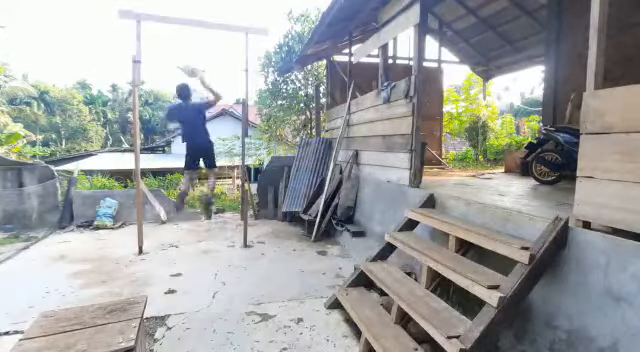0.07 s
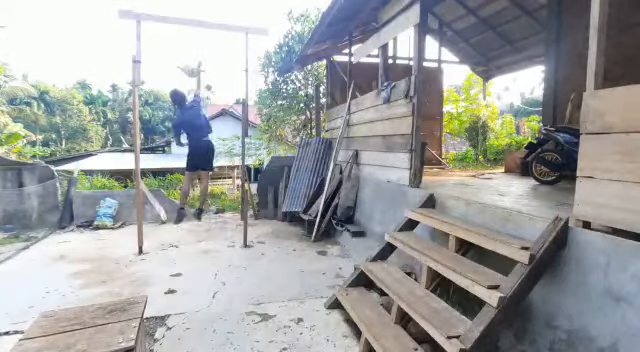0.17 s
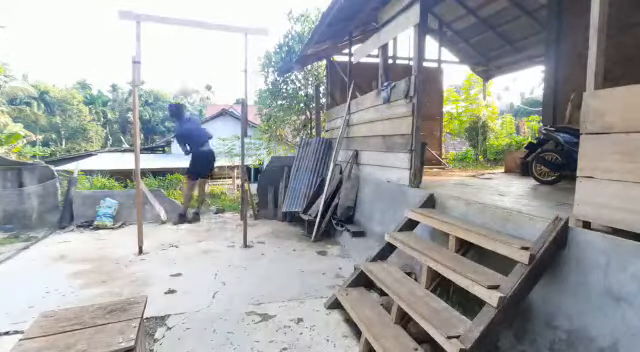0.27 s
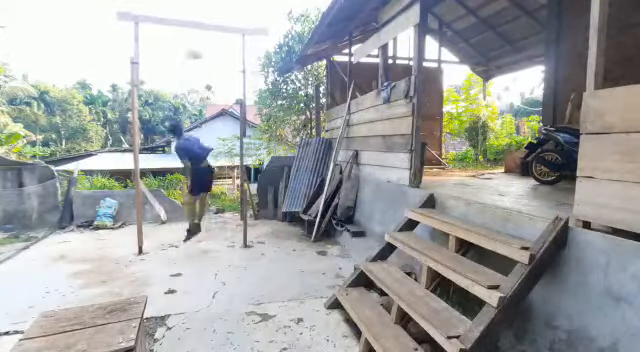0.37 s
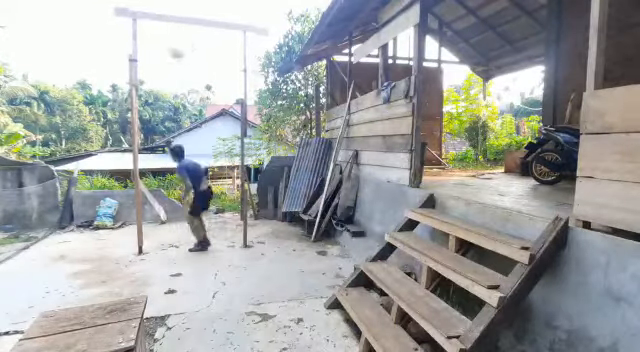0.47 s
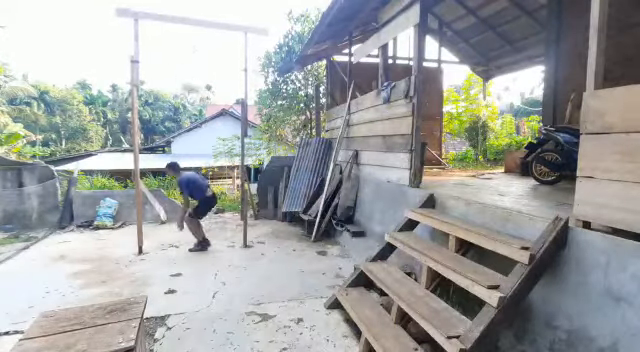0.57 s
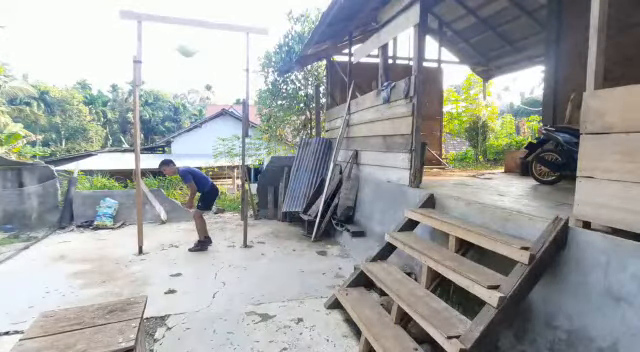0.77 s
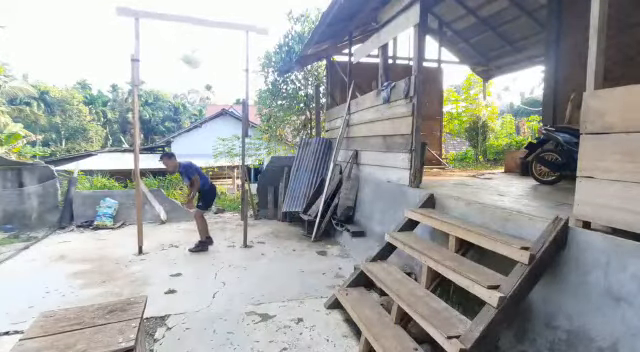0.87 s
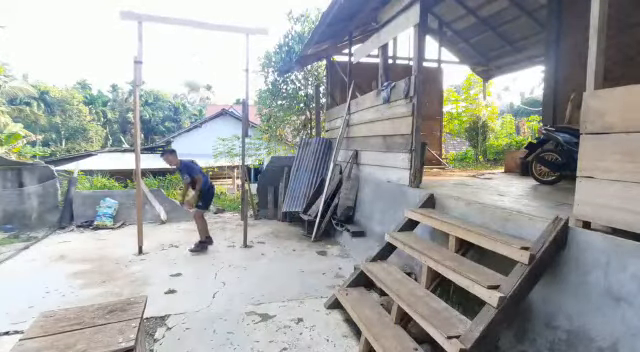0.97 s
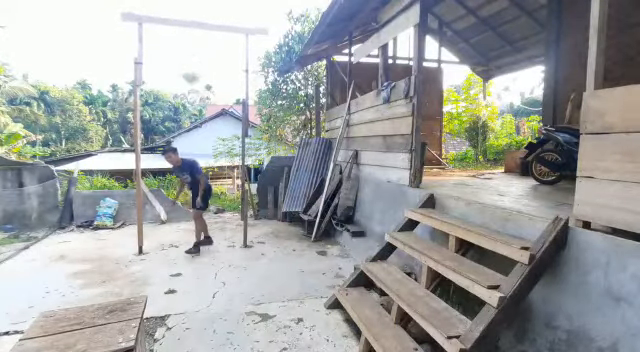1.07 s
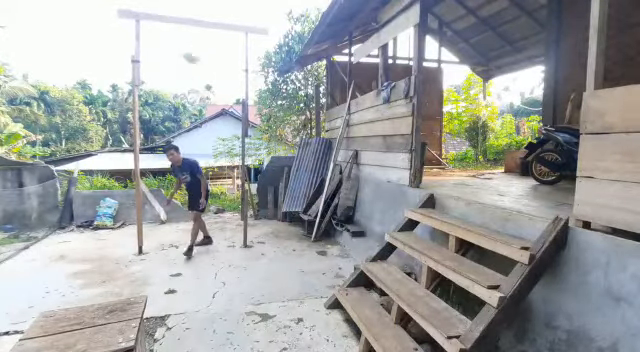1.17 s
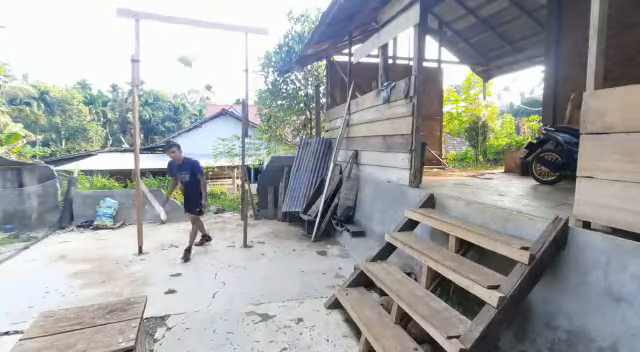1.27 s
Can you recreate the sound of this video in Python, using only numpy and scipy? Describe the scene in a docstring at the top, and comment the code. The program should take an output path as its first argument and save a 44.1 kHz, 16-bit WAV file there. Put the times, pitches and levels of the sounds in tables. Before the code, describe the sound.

One loud ball slap in an open concrete yard, then shuffling steps with soft thuds and two quieter woody knocks; low receding rumble, far idling engine and thin insects behind, phone microphone a few metres away.

```python
"""A low rumble, a distant idling engine, a thin whine and a faint insect band run under a player's shoes.
The player slaps a ball hanging from a wooden frame in a concrete yard, then shuffles; two hollow knocks follow.
Ball and knocks are sums of dying tones, with noise tails for the yard; house walls echo the blows.
Scuffs, rumble, whine and insects are shaped noise; the engine is a stack of sine waves.
A phone listens, its left port nearer to the play."""
import sys
import numpy as np
from scipy import signal
from scipy.fft import rfft, irfft
from scipy.io import wavfile
from scipy.ndimage import uniform_filter1d

SR = 44100
rng = np.random.default_rng(int(sys.argv[2]) if len(sys.argv) > 2 else 0)


def inscribe(sig):
    """Save sig as 16-bit PCM at rate SR to the path in sys.argv[1].

    A 1-D sig is mono; a 2-D sig holds one channel per row.
    Samples are clipped to [-1, 1] before scaling.
    """
    pcm = np.round(np.clip(np.atleast_2d(sig).T, -1, 1) * 32767)
    wavfile.write(sys.argv[1], SR, pcm.astype(np.int16))


def undo_db(level):
    """Turn decibels back into plain size, where 20 dB means ten times bigger."""
    steps = np.asarray(level, float) / 20
    return 10 ** steps


N = 57330  # length in samples
HZ = np.maximum(np.fft.rfftfreq(N, 1 / SR), 1)  # frequency of each spectrum bin, at least 1 Hz
T = np.arange(N) / SR  # time in s


def read(table, hz=HZ):
    """Reads a (f/Hz, value) table, with straight lines between its points on a log-frequency axis."""
    points = np.array(table, float)
    return np.interp(np.log(hz), np.log(points[:, 0]), points[:, 1])


def unit(x):
    """Scales a signal to rms 1."""
    return x / np.sqrt(np.mean(x ** 2))


def diffuse(spectrum, source=None):
    """Coloured noise from all around: partly alike at the two ports; returns spectra of rms 1."""
    # how alike diffuse sound is at the two ports: [f/Hz, likeness 0-1]
    likeness = [(60, 0.97), (300, 0.93), (800, 0.84), (2500, 0), (8000, 0.16)]
    first, second = (rfft(rng.standard_normal(N) if source is None else source()) for _ in range(2))
    shared = np.clip(read(likeness), 0, 1)
    right = shared * first + np.sqrt(1 - shared ** 2) * second
    coloured = np.array([first, right]) * undo_db(read(spectrum))
    return rfft(unit(irfft(coloured, N)))


def bands(spectra, shape):
    """Splits noise into overlapping half-octave bands and gives each the envelope shape(hz)."""
    out = 0
    for octave in np.arange(9, 29) / 2:  # log2 of the band centre in Hz
        weight = np.clip(1 - 2 * np.abs(np.log2(HZ) - octave), 0, 1)
        out = out + irfft(spectra * weight, N) * shape(2 ** octave)
    return out


def fade(start, rise, t60, hold=0.):
    """Envelope with an exponential rise and fall; the fall begins hold s after the start, 60 dB per t60."""
    since = np.maximum(T - start, 0)
    return (1 - np.exp(-since / rise)) * undo_db(-60 * np.maximum(since - hold, 0) / t60)


def walk(rate):
    """A slow random curve of rms 1: levels held for 1 / rate s, then smoothed twice."""
    hold = int(SR / rate)  # samples
    levels = np.repeat(rng.standard_normal(N // hold + 1), hold)
    smooth = uniform_filter1d(uniform_filter1d(levels, hold), hold)
    return unit(smooth[:N])


def narrow(hz, width_hz, channels=1):
    """Noise of rms 1 in a narrow bell-shaped band; width_hz is from the centre to 1/e of its height."""
    bell = np.exp(-((HZ - hz) / width_hz) ** 2)
    return unit(irfft(rfft(rng.standard_normal((channels, N))) * bell, N))


def ring(blows, modes_hz, modes, push):
    """Each blow starts every mode, which swells with a time constant of push cycles and dies away.

    Hard blows are brighter: their tilt raises modes above 500 Hz and lowers those below."""
    out = np.zeros(N)
    for at, db, tilt_db in blows:
        since = np.maximum(T - at, 0)
        for hz, (mode_db, t60) in zip(modes_hz, modes):
            start_db = db + mode_db + tilt_db * np.log2(hz / 500)
            swell = 1 - np.exp(-since * hz / push)
            out += undo_db(start_db - 60 * since / t60) * swell * np.sin(2 * np.pi * hz * since)
    return out


def rumble(fall_db):
    """Receding noise whose bands swell together and also flicker each on their own."""
    # colour of the rumble: [f/Hz, relative level per Hz/dB]
    colour = [(30, -3.5), (60, -9), (100, -5), (150, -9), (230, -18.5), (330, -12), (500, -22), (800, -27),
              (1500, -33.5), (3000, -42.5), (3800, -45), (4500, -60.5), (8000, -55), (16000, -64)]
    level_db, swell_db, flicker_db = -39, 2, 0.5  # swell and flicker are rms
    swell = walk(1.43)
    noise = bands(diffuse(colour), lambda hz: undo_db(swell_db * swell + flicker_db * walk(9.3)))
    return undo_db(level_db + fall_db) * noise


def engine(waver_db):
    """The far engine: sine waves at multiples of a firing rate that wavers and creeps up."""
    # which multiples of the firing rate are heard: [multiple]
    orders = [3, 4, 5, 6, 10, 11, 13]
    # each multiple's loudness: [level at the start/dB, change/dB per s]
    levels = [(-49, -5), (-53, 0), (-42, -7), (-50, -6), (-59, 7), (-49, -10), (-57, -2)]
    rate_hz, creep_hz_per_s, waver_hz = 27.75, .65, .08
    firing_hz = rate_hz + creep_hz_per_s * T + waver_hz * walk(6.4)
    turn = 2 * np.pi * np.cumsum(firing_hz) / SR  # phase in radians
    out = 0
    for order, (start_db, db_per_s) in zip(orders, levels):
        level = undo_db(start_db + db_per_s * T + waver_db * walk(7.48))
        out = out + level * np.sin(order * turn + 2 * np.pi * rng.random())
    return out


def whine():
    """A thin whine, made of narrow-band noise that fades steadily."""
    level_db, db_per_s = -65, -38
    return undo_db(level_db + db_per_s * T) * narrow(2960, 240)


def insects(fall_db, waver_db):
    """A thin insect band: narrow noise, separate at each port, that wavers and slowly fades."""
    level_db = -77
    return undo_db(level_db + fall_db + waver_db * walk(19.5)) * narrow(7130, 320, channels=2)


def background():
    """Rumble and insects fade at one pace, beside the engine and the whine."""
    fall_db = -5.5 * T  # dB per s times s
    waver_db = 3.5  # rms, for engine and insects
    return rumble(fall_db) + engine(waver_db) + whine() + insects(fall_db, waver_db)


def scuffs():
    """Soles scuffing on grit: crushed grains over a smooth rub, with a level that flickers."""
    # slides: [start t/s, rise/s, hold/s, fall t60/s, level/dB, brightness/dB per octave around 4000 Hz]
    slides = [(0.163, .002, .03, .2, -63, 2), (0.449, 0.0017, 0.04, 0.13, -38.5, 0),
              (0.467, 0.016, 0.028, 0.38, -40, 1.5), (0.624, 0.043, 0.05, 0.29, -42, 0),
              (0.758, 0.0089, 0.025, 0.48, -43.5, 1.6), (0.795, 0.042, 0.029, 0.18, -44.5, 2.9),
              (0.994, 0.022, 0.033, 0.43, -42, -0.3), (1.174, 0.0042, 0.0088, 0.31, -51.5, -0.5),
              (1.203, 0.014, 0.012, 0.54, -64, 12)]
    # colour of the grit: [f/Hz, relative level per Hz/dB]
    colour = [(240, -42), (400, -3.5), (1200, -2.5), (1930, -9), (3020, -13.5), (4730, -17), (9610, -23),
              (12700, -26), (16000, -30.5)]
    grains_per_s, smooth_share = 10000, 0.64

    def grit():
        grains = (rng.random(N) < grains_per_s / SR) * rng.standard_normal(N)
        return unit(grains) + smooth_share * rng.standard_normal(N)

    def shape(hz):
        return sum(undo_db(db + tilt_db * np.log2(hz / 4000)) * fade(at, rise, t60, hold)
                   for at, rise, hold, t60, db, tilt_db in slides)

    return bands(diffuse(colour, grit), shape) * undo_db(1.6 * walk(70))  # flicker of 1.6 dB rms


def slap():
    """The hand makes the ball ring and its skin crack; walls echo it and the yard adds a noise tail."""
    # hand on the ball, then its echoes from the walls: [t/s, level/dB, hardness/dB per octave]
    blows = [(.2101, -11, 4.5), (.2111, -14, 3.5), (.2151, -27.5, -7), (.2361, -29, 6), (.2491, -26, -1),
             (.2758, -30, 0)]
    # pitches of the ball's modes: [f/Hz]
    ball_hz = [103, 140, 182, 232, 264, 738, 924, 1060, 1345, 2460]
    # how each mode rings: [level/dB, t60/s]
    ball = [(-15, 0.45), (7, 0.27), (6.5, 0.076), (10.5, 0.0462), (-2.5, 0.19), (-9.5, 0.15), (-13, 0.12),
            (-1, 0.016), (-8, 0.038), (-13, 0.015)]
    # colour of the crack: [f/Hz, relative level per Hz/dB]
    crack_colour = [(1500, 18), (3000, -6), (6000, -7.5), (9500, -10.5), (13000, -9.5), (16000, -21)]
    # colour of the yard's tail: [f/Hz, relative level per Hz/dB]
    tail_colour = [(29, -45), (55, -5.5), (110, -4), (203, -9), (264, -3.5), (410, -13), (1020, -9.5),
                   (1240, -15.5), (2490, -25.5), (16000, -51.5)]
    # how long the tail lasts: [f/Hz, t60/s]
    tail_t60 = [(100, 0.72), (500, 0.35), (2000, 0.52), (12000, 0.56)]
    crack_db, crack_rise_s, crack_hold_s, crack_t60_s = -8.5, .0008, .0018, .005
    tail_db, tail_rise_s, push_cycles = -18, 0.0012, .46
    at = blows[0][0]
    # the crack begins just before the ring
    crack_shape = fade(at - crack_rise_s, crack_rise_s, crack_t60_s, crack_hold_s)
    crack = undo_db(crack_db) * irfft(diffuse(crack_colour), N) * crack_shape
    tail = bands(diffuse(tail_colour), lambda hz: fade(at, tail_rise_s, read(tail_t60, hz)))
    return ring(blows, ball_hz, ball, push_cycles) + crack + undo_db(tail_db) * tail


def steps():
    """Grit cracks under a sole as noise ticks; the frame and body weight in the ground thud softly."""
    # grit cracking: [t/s, level/dB, f/Hz, width from centre to 1/e/octaves]
    ticks = [(0.451, -26.5, 4570, 0.97), (.478, -53, 1800, 0.72), (0.514, -59, 12840, .4),
             (.766, -37, 4020, 0.29), (0.776, -33, 4020, 0.34), (0.997, -38, 1190, 0.47),
             (1.245, -42, 12100, 0.8)]
    # thuds of the frame after the slap and of body weight: [t/s, level/dB, f/Hz]
    thuds = [(.238, -18.5, 104), (0.456, -32, 76.4), (0.469, -26, 290), (0.537, -38, 58.5),
             (0.89, -32.5, 71.4), (0.949, -30, 71.6), (1.078, -34.5, 65)]
    tick_rise_s, tick_t60_s = .0001, 0.006
    push_cycles, t60_cycles = 1.0, 24
    out = np.zeros((2, N))
    noise = diffuse([(100, 0), (20000, 0)])  # even at all frequencies
    for at, db, hz, octaves in ticks:
        bell = np.exp(-(np.log2(HZ / hz) / octaves) ** 2)
        tick = unit(irfft(noise * bell, N))
        out += undo_db(db) * tick * fade(at, tick_rise_s, tick_t60_s)
    for at, db, hz in thuds:
        out += ring([(at, db, 0)], [hz], [(0, t60_cycles / hz)], push_cycles)
    return out


def knocks():
    """Each hollow knock is a short run of contacts that ring, and the yard answers with a slower tail."""
    # contacts: [t/s, level/dB, hardness/dB per octave]
    contacts = [(.6659, -26.5, 7), (.6664, -22, -3), (.6694, -16, -7), (.6751, -14.5, 5), (1.018, -26.5, 5),
                (1.023, -15.5, -7), (1.0272, -22, .5), (1.0332, -29, 7)]
    # pitches of the hollow modes: [f/Hz]
    hollow_hz = [175, 280, 433, 522, 733, 1090, 1390, 1684, 2118]
    # how each mode rings: [level/dB, t60/s]
    hollow = [(-6, 0.026), (3, 0.028), (2.1, 0.032), (-8, 0.062), (0.6, 0.031), (2, 0.013), (-16, 0.075),
              (-17.5, 0.029), (-21.5, .04)]
    # colour of the yard's answer: [f/Hz, relative level per Hz/dB]
    tail_colour = [(47, -33), (80, -15), (136, -1), (182, -6.5), (283, -5.5), (520, -8.5), (1050, -7.5),
                   (3470, -36.5), (16000, -103)]
    # when the yard answers: [t/s, level/dB]
    answers = [(0.677, -21), (1.028, -22.5)]
    # how long the answer lasts: [f/Hz, t60/s]
    tail_t60 = [(200, 0.23), (1000, 0.24), (8000, 0.36)]
    tail_rise_s, push_cycles = 0.011, .67

    def shape(hz):
        return sum(undo_db(db) * fade(at, tail_rise_s, read(tail_t60, hz)) for at, db in answers)

    return ring(contacts, hollow_hz, hollow, push_cycles) + bands(diffuse(tail_colour), shape)


def scene():
    """All sources as they reach the phone."""
    return slap() + knocks() + steps() + scuffs() + background()


def roll_off(x):
    """The treble ends steeply here."""
    return signal.sosfilt(signal.butter(12, 16740, fs=SR, output="sos"), x)


def record(dry):
    """The microphone cuts the deep bass; the phone body colours the ports, and the right one hears later."""
    # colour of the microphone: [f/Hz, level/dB]
    mic = [(5000, -0.47), (8200, -1), (9600, -7), (11000, -2.5), (13000, 1.5), (16000, -4.5)]
    # balance of the ports: [f/Hz, left minus right level/dB]
    balance = [(60, 2), (300, 2), (1000, 5), (2000, 10.5), (4500, 1.5), (9000, -3), (14000, 6)]
    low_hz, right_lag_s = 51.5, 0.00023
    side = np.array([[1], [-1]]) / 2  # left, right
    lag = np.exp(2j * np.pi * HZ * right_lag_s * (side - .5))  # delays the right port only
    colour = undo_db(read(mic) + read(balance) * side)
    bass_cut = signal.butter(3, low_hz, "high", fs=SR, output="sos")
    cut = signal.sosfiltfilt(bass_cut, dry)  # run forwards and backwards
    cut = cut * np.minimum((T[-1] - T) * 1000, 1)  # fade out over the last 1 ms
    return roll_off(irfft(rfft(cut) * (colour * lag), N))


dry = scene()
out = record(dry)
inscribe(out)
```